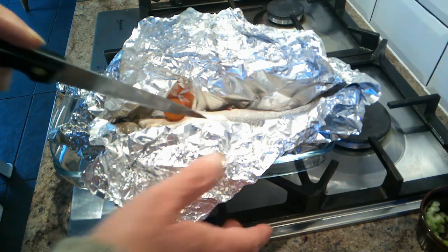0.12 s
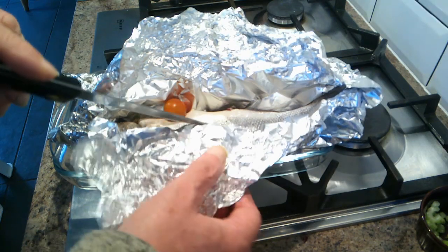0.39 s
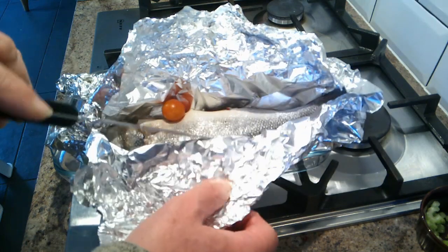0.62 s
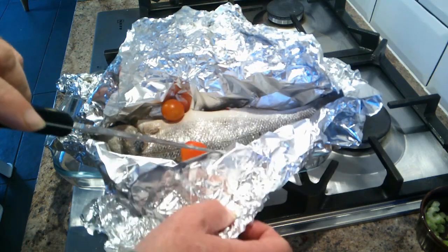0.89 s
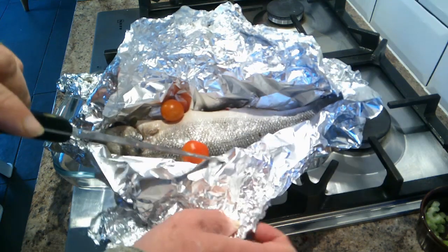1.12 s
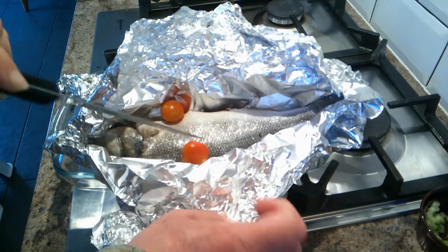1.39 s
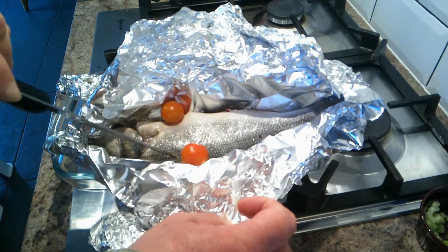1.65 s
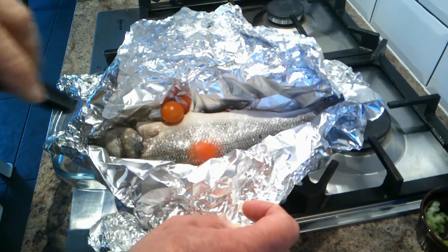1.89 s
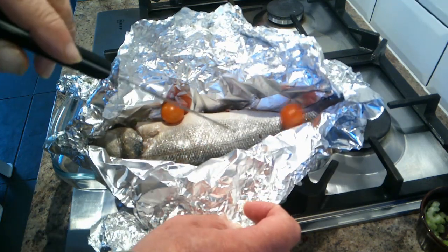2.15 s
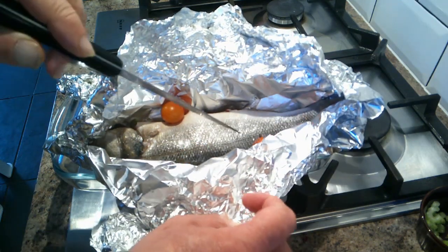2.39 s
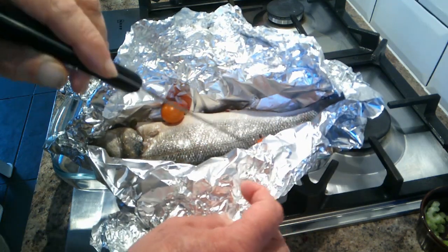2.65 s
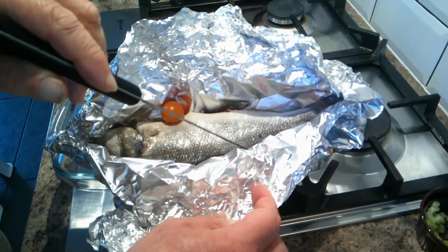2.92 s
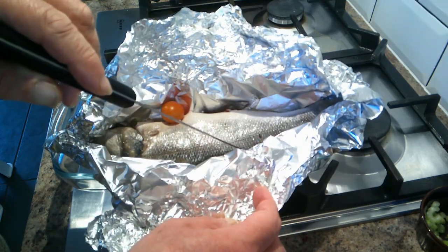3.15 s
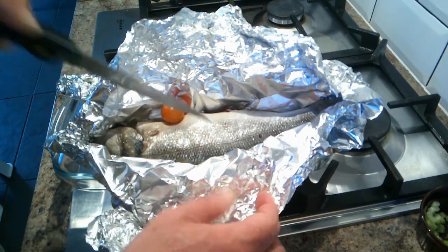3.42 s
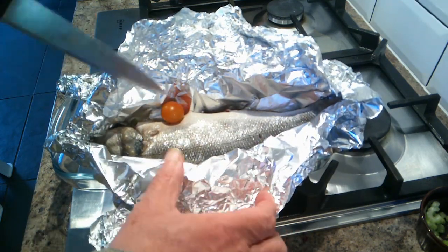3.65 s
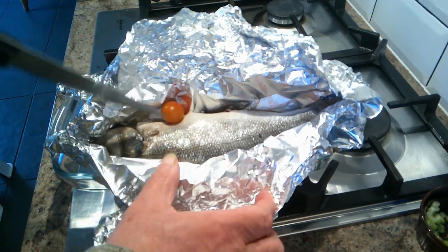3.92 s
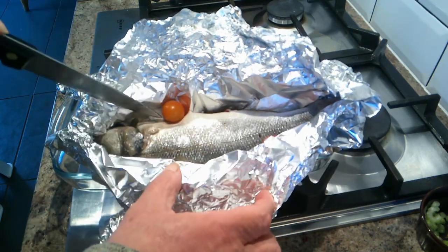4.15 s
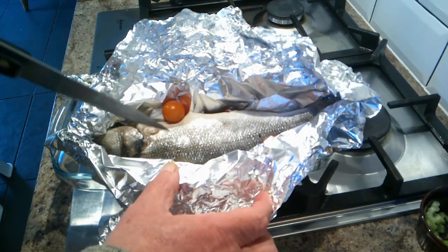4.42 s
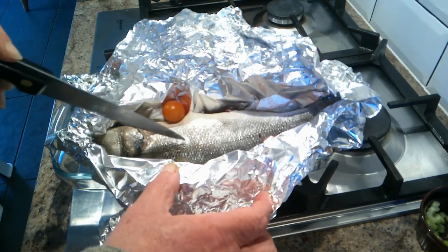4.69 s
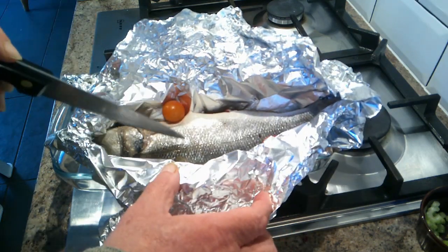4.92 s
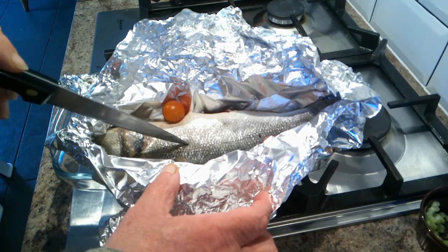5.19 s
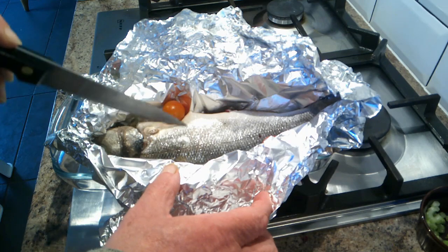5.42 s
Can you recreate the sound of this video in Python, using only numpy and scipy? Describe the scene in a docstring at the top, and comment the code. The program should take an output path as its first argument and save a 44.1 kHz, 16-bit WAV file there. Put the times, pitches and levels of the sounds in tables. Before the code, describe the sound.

A low, fluttering oven hum with soft fan air runs throughout. Over it, hands peel crumpled foil open in bright, irregular pops and pinging creases, busiest early, sparser in the middle with two tiny blade scrapes, and briefly lively again late. Dry kitchen with short hard echoes, close microphone, sound in the left channel only, loudest cracks slightly rounded.

```python
"""A kitchen, where crumpled aluminium foil is pulled open by hand close to a small microphone wired to the left only.
Creases snap one by one as noise bursts with a ping and a push, and in clumps of short pops that blur into rustle.
A thumb and a knife slide over foil and food: friction noise through narrow resonances.
Two oven motors, sums of cosines, beat in a low hum under a rush of fan air made of shaped noise."""
import sys
import numpy as np
from scipy import signal
from scipy.io import wavfile
from scipy.ndimage import uniform_filter1d

SR = 44100
rng = np.random.default_rng(int(sys.argv[2]) if len(sys.argv) > 2 else 0)


def volts_from_decibels(level):
    """Turn decibel levels (scalar or array-like) into linear amplitude factors."""
    exponent = np.asarray(level, float) / 20
    return 10 ** exponent


def unload_audio(sound):
    """Save the sound as a 16-bit wav file, at the path given as the first command line argument."""
    columns = np.transpose(np.atleast_2d(sound))
    # keep every value between -1 and 1, then stretch to whole-number steps
    steps = np.round(np.clip(columns, -1, 1) * 32767)
    wavfile.write(sys.argv[1], SR, steps.astype(np.int16))


N = 245019

# All levels in dB stand ahead of the preamplifier.


def evened(x):
    """Scales to rms 1."""
    return x / np.sqrt(np.mean(x ** 2) + 1e-20)


def read(points, hz):
    """Reads a spectrum on a log-frequency axis."""
    f, value = np.transpose(points)
    return np.interp(np.log(hz + 1), np.log(f + 1), value)


def follow(rows):
    """Turns the columns of a curve table into sample-by-sample curves."""
    s, *columns = np.transpose(rows)
    return [np.interp(np.arange(N) / SR, s, column) for column in columns]


def band(x, lo_hz, hi_hz):
    """Causal band-pass."""
    edges = [lo_hz, min(hi_hz, .45 * SR)]
    return signal.sosfilt(signal.butter(2, edges, "bandpass", fs=SR, output="sos"), x)


def resonate(x, hz, width):
    """Resonance of gain 1, run twice: shifts hz down to zero, smooths, and shifts back."""
    turn = np.exp(2j * np.pi * np.cumsum(hz * np.ones(len(x))) / SR)
    r = np.exp(-np.pi * width / SR)
    for _ in range(2):
        x = 2 * (turn * signal.lfilter([1 - r], [1, -r], x / turn)).real
    return x


# Motor speeds. Each row: time in seconds, fan speed in Hz, second motor speed in Hz.
MOTOR_SPEEDS = [(0, 41.68, 32.15), (2.6, 41.69, 32.15), (3.3, 41.85, 32.12), (3.55, 41.3, 31.3),
                (3.9, 41.65, 31.95), (4.3, 41.66, 32.07), (5.6, 41.67, 32.11)]
# Hum that holds steady until the load shifts once; fan orders 1-3, then the second motor.
# Each row: steady rms in dB, shift in dB, time of full shift in seconds, onset and recovery in seconds.
MOTOR_HUM = [(-29.3, 3.4, 3.35, .45, .2), (-29.6, -5, 3.45, .25, .35), (-37, 3.2, 3.4, .4, 1.2),
             (-33, -5.6, 3.72, .25, .8)]
# Tones where the motors shake each other.
# Each row: fan order, second motor order, steady rms in dB, polarity.
MIXED_TONES = [(4, 0, -49, 1), (5, 0, -60, 1), (6, 0, -51, 1), (7, 0, -60, 1), (11, 0, -60, 1),
               (0, 2, -49, -1), (0, 3, -47, 1), (1, 1, -42, -1), (3, -1, -38, 1), (4, -2, -36, 1),
               (1, 2, -41, 1), (2, 1, -49, -1), (4, -1, -49, 1), (2, -1, -50, 1), (3, -2, -50, 1),
               (3, 1, -58, -1)]
# Angles at the start, in turns: fan, second motor, mains buzz.
START_TURNS = (.85, .77, .57)


def motors():
    """Shaft orders of both motors, their sum and difference tones, and the mains buzz."""
    mains_hz, mains_db = 100.18, -37.5
    lag_turns = .38  # every tone lags by the same part of a turn
    speeds = follow(MOTOR_SPEEDS)
    fan, other = (start + np.cumsum(hz) / SR for start, hz in zip(START_TURNS, speeds))
    t = np.arange(N) / SR
    levels = []
    for db, shift_db, s, onset, recovery in MOTOR_HUM:
        pace = np.where(t < s, onset, recovery)
        levels.append(db + shift_db * np.exp(-((t - s) / pace) ** 2))
    *orders_db, other_db = levels
    sag_db = other_db - MOTOR_HUM[-1][0]  # mixed tones weaken with the second motor
    tones = [(volts_from_decibels(db), (k + 1) * fan) for k, db in enumerate(orders_db)]
    tones += [(volts_from_decibels(other_db), other)]
    for m, n, db, sign in MIXED_TONES:
        tones.append((sign * volts_from_decibels(db + abs(n) * sag_db), m * fan + n * other))
    tones += [(volts_from_decibels(mains_db), START_TURNS[2] + mains_hz * t)]
    return np.sqrt(2) * sum(gain * np.cos(2 * np.pi * (turns - lag_turns)) for gain, turns in tones)


# Colour of the fan air. Each row: frequency in Hz, relative density in dB per Hz.
AIR_COLOUR = [(88, -34.5), (150, -15), (175, -6.5), (268, -5), (346, -28), (462, -15), (656, -20),
              (2760, -33), (4750, -59.5), (9000, -78), (10900, -90), (13000, -79), (15500, -91)]


def air(patchy_db=2.0):
    """Fan air: random short-time spectra with drifting patches, and a rumble beneath."""
    rush_db, rumble_db = -48, -38  # rms
    frames, hz = N // 512 + 5, np.fft.rfftfreq(2048, 1 / SR)
    a, b, patches = rng.standard_normal((frames, 1025, 3)).T
    patches = evened(uniform_filter1d(uniform_filter1d(patches, 16, 0), 8, 1))
    spectra = (a + 1j * b) * volts_from_decibels(read(AIR_COLOUR, hz)[:, None] + patchy_db * patches)
    rush = signal.istft(spectra, nperseg=2048, noverlap=1536)[1][:N]
    rumble = band(rng.standard_normal(N), 56, 142.0)
    return volts_from_decibels(rush_db) * evened(rush) + volts_from_decibels(rumble_db) * evened(rumble)


# Foil as this microphone colours it. Each row: frequency in Hz, relative level in dB.
FOIL_COLOUR = [(120, -19.5), (220, -9), (700, -1.5), (1000, -6), (2500, -5.5), (3700, -10), (4800, -21.5),
               (6200, -13), (8000, -15), (9500, -21), (10800, -37.5), (13400, -27), (15000, -36.5),
               (15800, -80.5)]


def foil_click():
    """Causal (minimum-phase) click with the colour of the foil."""
    log_gain = np.log(volts_from_decibels(read(FOIL_COLOUR, np.fft.rfftfreq(4096, 1 / SR))))
    full = np.r_[log_gain, log_gain[-2:0:-1]]
    return np.fft.ifft(np.exp(np.conj(signal.hilbert(full)))).real[:2048]


def stroke(start, length):
    """Gain of one hand stroke: every one swells in and dies away alike."""
    attack_s, release_s = 0.028, 0.011
    t = np.arange(round(length * SR) + SR // 4) / SR
    swell = np.minimum(t / attack_s, 1)
    release = np.exp(-np.maximum(t - length, 0) / release_s)
    gain = np.zeros(N + SR)
    gain[round(start * SR):][:len(t)] = swell * release
    return gain[:N]


# The hand works the sheet in strokes.
# Each row: start in seconds, length in seconds, crackle level in dB, sizzle in dB re crackle,
# grain from 0 (smooth rustle) to 1 (separate pops).
HAND_STROKES = [(0.232, 0.044, -30, -18, 1), (0.278, 0.13, -43, -12, 0.93),
                (0.403, 0.085, -34, -11.5, 0.86), (0.5, 0.18, -40, -16, 0.81),
                (0.664, 0.098, -38.5, -10.5, 0.61), (0.75, .2, -36.5, -11, 0.25),
                (0.943, 0.23, -39, -18, 0.95), (1.109, .16, -34, -19, 0.84), (1.277, 0.11, -42.5, -21.5, 1),
                (1.387, 0.022, -33.5, -20, 1), (1.447, 0.13, -48.5, -16.5, 0.85),
                (1.6, 0.88, -61.5, -15, 0.45), (2.014, .18, -47, -18, 0.98),
                (2.296, 0.29, -52.5, -22, 0.99), (2.529, .05, -42.5, -13, 0.91),
                (2.643, 0.073, -48.5, -13, .5), (2.698, 0.034, -36.5, -21, 0.96),
                (2.802, 0.086, -48, -22.5, 0.92), (3.1, 0.15, -50.5, -21, 1),
                (3.279, 0.1, -45.5, -12.5, 0.81), (3.408, 0.089, -48, -15.5, 0.81),
                (3.504, 0.34, -54, -12.5, 0.56), (3.848, 0.17, -48.5, -10, 0.75),
                (3.967, 0.075, -27.5, -15, 0.84), (4.052, 0.1, -41, -15.5, 0.83),
                (4.162, 0.098, -35.5, -19.5, 0.52), (4.27, .12, -56, -17.5, 0.43)]


def crackle(per_s=2600, spread_db=4.0, clump_db=3.5):
    """Small creases pop in clumps, each ringing its patch a few cycles; gentle strokes blur into rustle."""
    rest = (-67, -13, 0)  # the sheet settles faintly throughout: crackle dB, sizzle dB re crackle, grain
    thud_db = -1.5  # low share re the body of the crackle
    clumps = volts_from_decibels(clump_db * evened(uniform_filter1d(rng.standard_normal(N), 300)))
    size = volts_from_decibels(spread_db * np.minimum(rng.exponential(1, N), 4))
    size = size * (rng.random(N) < per_s / SR) * clumps
    patch, t = rng.integers(0, 24, N), np.arange(800) / SR
    pops = size * rng.choice([-1., 1.], N)
    for k, hz in enumerate(np.geomspace(600, 4400, 24)):
        tap = np.sin(2 * np.pi * hz * t) * np.exp(-t * hz / 1.96)
        pops += signal.oaconvolve(size * (patch == k), 0.64 * tap)[:N]
    rustle = clumps ** .4 * rng.standard_normal(N)
    shapes = np.array([stroke(s, length) for s, length, *_ in HAND_STROKES] + [np.ones(N)])
    db, sizzle_db, grain = np.transpose([row[2:] for row in HAND_STROKES] + [rest])
    out, click = np.zeros(N), foil_click()
    for source, share in (pops, grain), (rustle, np.sqrt(1 - grain ** 2)):
        x = signal.oaconvolve(source, click)[:N]
        body, thud, sizzle = band(x, 450, 2860), band(x, 80, 614), band(x, 5330, 20000)
        low = evened(body) + volts_from_decibels(thud_db) * evened(thud)
        out += share * volts_from_decibels(db) @ shapes * low
        out += share * volts_from_decibels(db + sizzle_db) @ shapes * evened(sizzle)
    return out


# Single creases that buckle.
# Each row: start in seconds, level in dB, ring in Hz, ring peak in dB re level, sizzle peak in dB re level.
CREASE_SNAPS = [(0.244, -19, 1257, -7.5, -13), (0.264, -15, 820, -51, -15), (0.296, -21, 1560, -8.5, -13),
                (0.339, -16, 2100, -7.5, -15.5), (0.356, -21, 900, -36, -10.5),
                (0.384, -21, 1585, -8, -5.5), (0.407, -26.5, 680, -7.5, -23), (0.425, -38.5, 953, 7, -14),
                (0.465, -33.5, 1360, 2.5, -18), (0.496, -28.5, 1630, -20, -1),
                (0.563, -9.5, 680, -49.5, -15), (0.606, -24.5, 2990, -8, -30),
                (0.623, -36.5, 1900, 10, 2.5), (0.635, -41.5, 2990, 13, -14), (0.693, -19.5, 2250, -8, -32),
                (0.723, -23, 710, -46, -14), (0.736, -25, 1990, -10, -33), (0.771, -13.5, 2430, -43, -9),
                (0.798, -14, 2530, -33, -24), (0.82, -13, 1210, -27, -9), (0.836, -24, 2430, -6, -24),
                (0.848, -14, 1690, -10.5, -21), (0.879, -19.5, 1636, -10, -24), (0.91, -31, 2330, -6, 1),
                (0.916, -22.5, 2430, -3.5, -5), (0.943, -22, 1526, -7, -18.5),
                (0.962, -11.5, 623, -3.5, -11), (0.9642, -6, 2460, -8.5, -14.5),
                (1.026, -17, 2484, -2, -14), (1.1, -38, 1080, 0, 6.5), (1.127, -32, 1063, -8, -3),
                (1.146, -8, 952, -9, -16.5), (1.202, -19, 1790, -10, -17), (1.212, -31, 2076, 3, -6),
                (1.252, -20.5, 700, -29, -12), (1.291, -29.5, 770, -27, 3.5),
                (1.374, -27, 1120, -11, -15.5), (1.402, -31.5, 1020, -1.5, -17),
                (1.472, -27, 774, -16.5, -20), (1.483, -23.5, 2260, -1.5, -12),
                (1.598, -19.5, 2980, -11.5, -13), (1.909, -25, 2220, -11.5, -16.5),
                (2.012, -30, 1670, -14.5, -9.5), (2.051, -18.5, 670, -14.5, -15),
                (2.069, -7.5, 2015, -11, -13), (2.085, -17, 1203, -19, -7), (2.127, -25.5, 768, -7.5, -11),
                (2.19, -43, 1780, 1, -28.5), (2.294, -22, 1254, 2, -14), (2.2946, -25.5, 414, 1, -19),
                (2.301, -22.5, 987, -3, -16), (2.4, -24, 2345, 5.5, -0.5), (2.546, -44, 1620, 6, -30),
                (2.714, -27.5, 685, -26, -16.5), (2.728, -29, 757, -15, -17), (2.816, -33, 760, -25, -5),
                (2.833, -29, 1110, -8, -22), (2.91, -24.5, 1790, -5, -15), (2.947, -37, 727, 1.5, -15),
                (3.013, -37, 667, 1, -18), (3.103, -21.5, 2930, -16.5, -13), (3.243, -34, 795, -12, -7.5),
                (3.261, -31, 824, -16, -19), (3.291, -29.5, 1690, -12, -9.5),
                (3.304, -27.5, 1050, -10.5, -25), (3.326, -18, 637, -2, -15), (3.483, -36.5, 1830, -21, -8),
                (3.782, -17.5, 2620, -20, -10), (3.844, -35, 766, -20, -3.5), (3.867, -33, 760, -7, -16),
                (3.881, -22.5, 708, -7, -16), (3.947, -17, 1884, -6.5, -13.5),
                (3.972, -27.5, 1450, -7.5, -22.5), (3.986, -15, 2090, -11, -12.5),
                (3.995, -18.5, 570, -2.5, -15), (4.024, -14.5, 720, -19, -8.5),
                (4.056, -17.5, 924, -14.5, -14.5), (4.081, -18, 2750, -12, -16.5),
                (4.105, -25.5, 1930, -6, -25), (4.18, -32, 790, -3.5, -25), (4.304, -29.5, 732, -4, -17),
                (5.049, -32.5, 762, -35, -12.5), (5.217, -22, 2000, -15.5, -14.5)]


def snaps():
    """A crease lets go in milliseconds of tiny slips; the flat patch beside it pings and the sheet pushes."""
    out, t, click = np.zeros(N + 4096), np.arange(4096) / SR, foil_click()
    slips = rng.standard_normal((len(CREASE_SNAPS), len(t)))
    for (s, db, hz, ring_db, sizzle_db), z in zip(CREASE_SNAPS, slips):
        # decay times in seconds: larger, lower patches take longer, and the ping dies sooner than the slips
        buckle = 0.0049 * (1500 / hz) ** 0.32
        ring = 0.0029 * (1500 / hz) ** 0.43
        swell = (1 - np.exp(-t / (0.07 * buckle))) * np.exp(-t / buckle)
        burst = signal.fftconvolve(z * swell, click)[:len(t)]
        # the patch is not flat: large ones shiver most in pitch
        wobble = uniform_filter1d(np.cumsum(z), 30) * .04 * (2500 / hz) ** .6
        ping = (1 - np.exp(-t / (0.2 * ring))) * np.exp(-t / ring)
        ping = ping * np.sin(2 * np.pi * hz * t + wobble)
        jerk = np.sign(z[0]) * t * np.exp(-t / 0.0006)  # the sheet jerks once
        push = jerk * (1 + .5 * evened(uniform_filter1d(z, 30)))
        push_db = -7.5 + 0.57 * ring_db  # stronger where the patch rings freely
        parts = ping, band(burst, 845, 5100), band(push, 200, 810), band(burst, 4300, SR / 3)
        shares = volts_from_decibels([ring_db, -5, push_db, sizzle_db])
        snap = sum(g * p / abs(p).max() for g, p in zip(shares, parts))
        out[round(s * SR):][:len(t)] += volts_from_decibels(db) * snap
    return out[:N]


# Slow slides that whistle in a fold; the first row is instead a brief narrow ring lingering after the snap at
# 1.6 s. # Each row: start in seconds, length in seconds, level in dB, fold in Hz, resonance width per pass in
# Hz.
FOLD_SLIDES = [(1.602, 0.042, -52, 2770, 120), (1.623, 0.51, -75, 3720, 200),
               (1.637, 0.53, -64.5, 2130, 198), (3.424, 0.13, -58, 1780, 497), (3.65, 0.12, -57, 2180, 500)]


def slides():
    """Fine friction noise sings in a fold of the foil and hisses faintly above it."""
    out, click = np.zeros(N), foil_click()
    for s, length, db, hz, width in FOLD_SLIDES:
        grit = rng.standard_normal(N)
        hiss = band(signal.oaconvolve(grit, click)[:N], 6000, 9500)
        song = evened(resonate(grit, hz, width)) + volts_from_decibels(-25.5) * evened(hiss)
        out += volts_from_decibels(db) * stroke(s, length) * song
    return out


# Blade drawn over skin. Each row: start in seconds, length in seconds, level in dB.
BLADE_STROKES = [(2.528, 0.08, -63.5), (2.643, .09, -61)]
# Edge tones of the blade. Each row: frequency in Hz, resonance width per pass in Hz, relative gain in dB.
BLADE_TONES = [(6480, 560, 9), (9400, 450, 3.5), (12400, 1200, -20.5)]


def scrape():
    """Two short strokes of the blade: grit through its edge tones."""
    grit = rng.standard_normal(N)
    edge = sum(volts_from_decibels(db) * resonate(grit, hz, width) for hz, width, db in BLADE_TONES)
    return sum(volts_from_decibels(db) * stroke(s, length) for s, length, db in BLADE_STROKES) * evened(edge)


# Echo decay of the room. Each row: frequency in Hz, time to fall 60 dB in seconds.
KITCHEN_DECAY = [(400, 0.34), (2500, 0.16), (9000, 0.16)]


def kitchen(x):
    """Sparse echoes of random sign off tiles and hob, each band dying at its own speed."""
    taps = np.zeros(SR // 2)
    at = np.arange(120, len(taps) - 20, 20)
    taps[at + rng.integers(0, 20, len(at))] = rng.choice([-1., 1.], len(at))
    hz, t, z = signal.stft(taps, SR, nperseg=256)
    decay = volts_from_decibels(-60 * t / read(KITCHEN_DECAY, hz)[:, None])
    tail = signal.istft(z * decay, SR, nperseg=256)[1]
    return signal.fftconvolve(x, tail / np.linalg.norm(tail))[:N]


def scene():
    """Foil sounds with their echoes over the oven; nothing reaches the right side."""
    oven = motors() + air()
    foil = crackle() + snaps() + slides() + scrape()
    left = oven + foil + volts_from_decibels(-14.5) * kitchen(foil)
    return np.array([left, 0 * left])


def band_limit(x):
    """A steep low-pass at the top of the band."""
    return signal.sosfilt(signal.butter(12, 15710, fs=SR, output="sos"), x)


def record(dry):
    """The preamplifier doubles the one live side and rounds off the loudest cracks."""
    mix = np.tanh(2 * dry)
    return band_limit(mix)


dry = scene()
out = record(dry)
unload_audio(out)
```